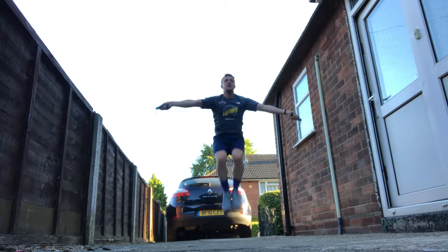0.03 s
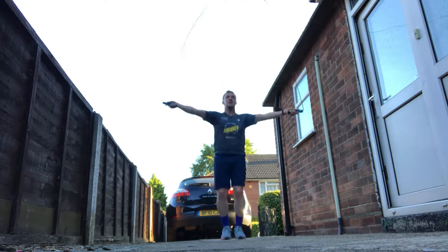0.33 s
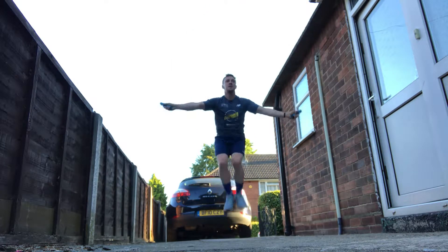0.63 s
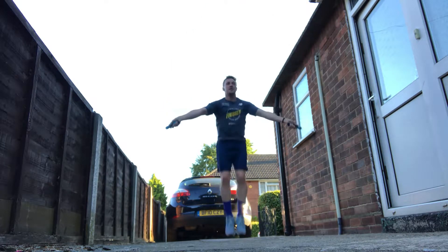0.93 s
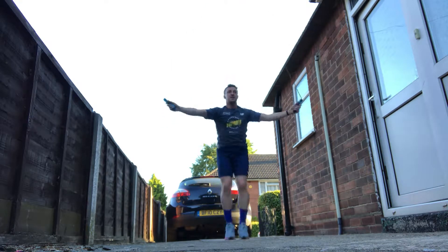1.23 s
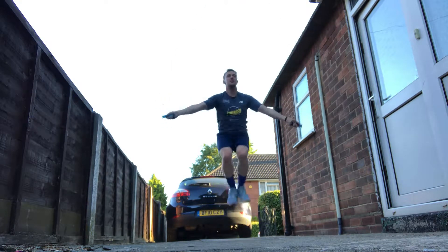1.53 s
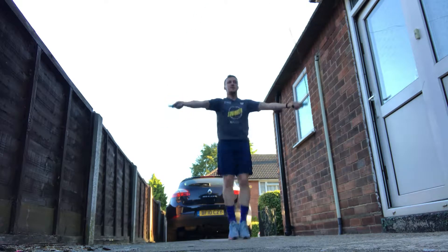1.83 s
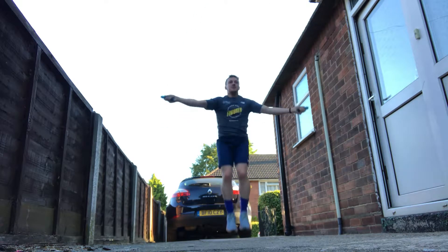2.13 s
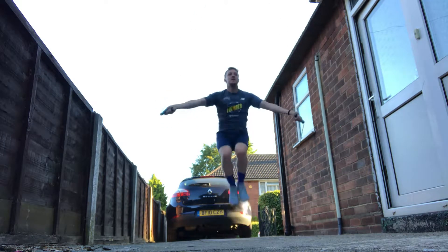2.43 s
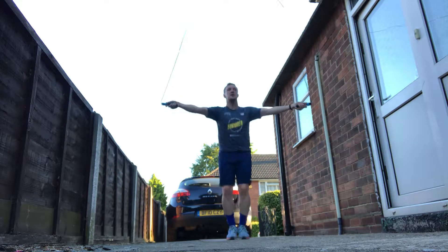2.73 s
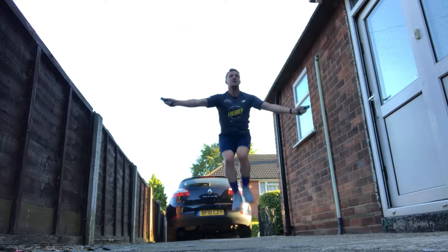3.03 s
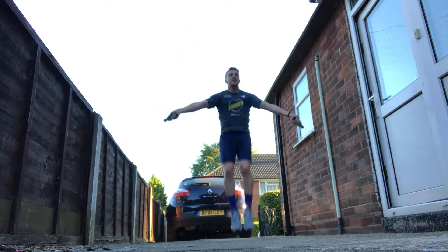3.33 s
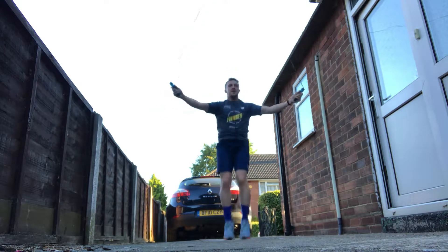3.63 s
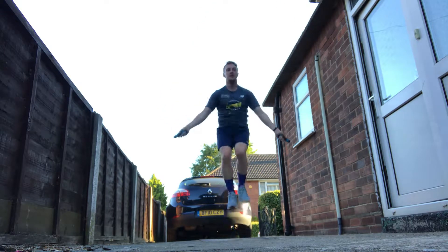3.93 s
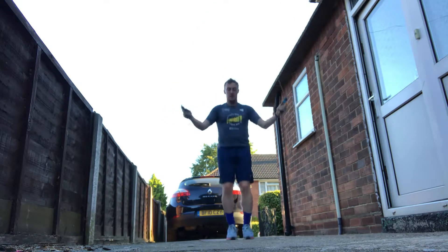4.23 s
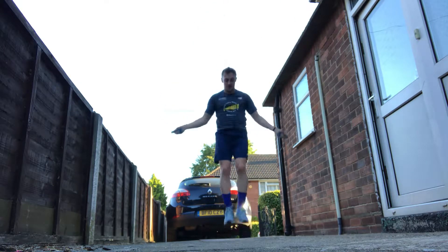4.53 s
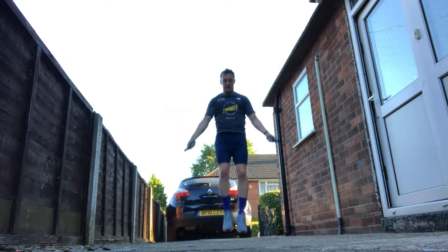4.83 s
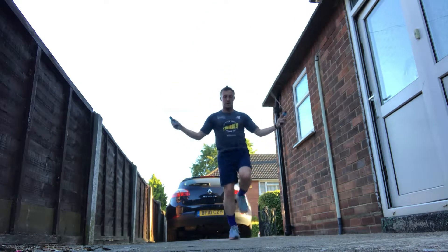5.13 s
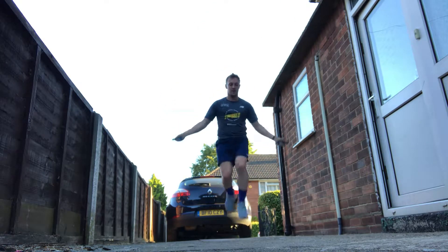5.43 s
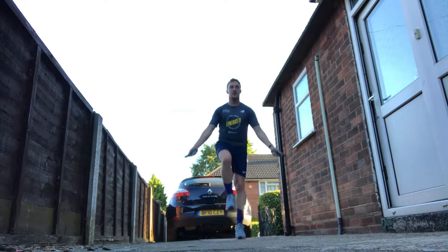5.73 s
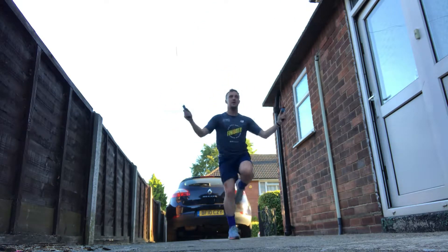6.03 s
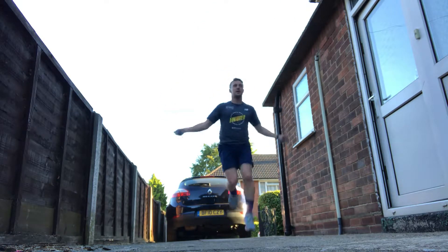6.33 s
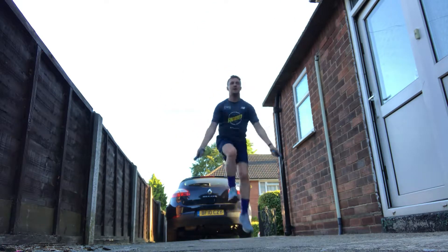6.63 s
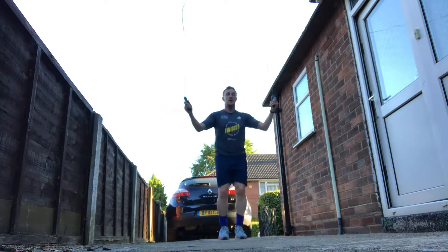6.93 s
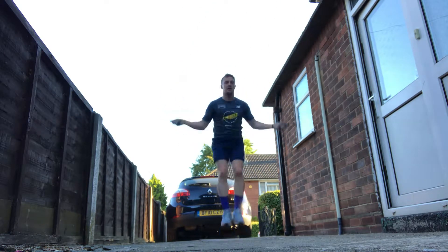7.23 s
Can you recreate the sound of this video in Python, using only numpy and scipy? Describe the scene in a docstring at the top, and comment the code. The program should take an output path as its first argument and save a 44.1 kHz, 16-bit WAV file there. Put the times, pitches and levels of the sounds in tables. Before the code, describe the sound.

Someone skips rope on a concrete driveway, heard from near the ground between a wooden fence and a brick wall that add short, close reflections. From the start, the thin rope makes a wavering, pulsing whistle, turning twice per jump. Shoes land about twice a second with a slap, a soft thud and a little crunch of grit, then scuff lightly as they push off. The rope catches with light ticks at about 1.1 and 1.6 seconds. From 4 seconds it is swung harder: the whistle climbs into a louder, higher swish, and the rope cracks sharply on the concrete once per jump, a little more than twice a second, strongest around 6.3 and 7.2 seconds. The landings become more uneven here, with small dry taps between them. A faint rush of stirred air and a distant outdoor hum continue underneath until the end, at about 7.5 seconds.

```python
"""Skipping rope on a concrete driveway

Heard from the ground, between a wooden fence and a brick wall. The thin rope sheds vortices and
whistles round twice a jump; shoes slap down, crunch on grit and scuff off again. The rope catches
a few times early on; after four seconds it is swung harder and cracks on the concrete once a jump.
Stirred air and a distant outdoor hum lie underneath."""
import sys
import numpy as np
from scipy import signal
from scipy.fft import rfft, irfft
from scipy.io import wavfile
from scipy.ndimage import uniform_filter1d

SR = 44100
rng = np.random.default_rng(int(sys.argv[2]) if len(sys.argv) > 2 else 0)


def file_out(sig):
    """Save sig as 16-bit WAV at sys.argv[1]."""
    # one column per channel
    cols = np.atleast_2d(sig).T
    # limit, then scale
    lim = np.clip(cols, -1, 1)
    pcm = np.round(lim * 32767).astype(np.int16)
    wavfile.write(sys.argv[1], SR, pcm)


N = 321930
TIME = np.arange(N) / SR

# rope hits on ground or shoe: t/s, strength/dB, tilt above 4 kHz/(dB per decade), scattered share/dB
ROPE_HITS = [(1.0747, -17, -24, -11.5), (1.109, -13, -10, -7), (1.5926, -10.5, -4, -7),
             (3.9806, -21, -35, -4.5), (4.0094, -7, 3.5, -3.5), (4.525, -3.5, 8, -2.5),
             (4.9977, -4, 4.5, -2), (5.4418, -4, 6, -1), (5.8705, -3.5, 7, -1.5), (6.3035, 2.5, 5.5, -3.5),
             (6.749, -9.5, 5.5, 3), (7.2151, -0.5, 8, -3)]
# footfalls, levels before make-up gain: t/s, slap/dB, thud/dB, grit/dB, rumble/dB, rumble lag/s
FOOTFALLS = [(0.355, -23, -41, -45, -49.5, .07), (0.841, -23.5, -40, -44, -51, .05),
             (1.307, -26.5, -42.5, -46.5, -49.5, .05), (1.783, -24.5, -43.5, -46.5, -49.5, 0.03),
             (2.255, -23.5, -40, -47.5, -47.5, 0.063), (2.746, -22.5, -48.5, -44, -50.5, .05),
             (3.227, -22, -41, -45, -55, 0.064), (3.721, -22, -42, -44, -51, 0.065),
             (4.208, -25, -44, -48.5, -48.5, 0.049), (4.71, -29.5, -38.5, -48.5, -47.5, 0.043),
             (5.166, -23.5, -42, -49.5, -50, .01), (5.564, -32.5, -89, -53.5, -55, 0.053),
             (5.605, -39.5, -45.5, -53.5, -49.5, .09), (6.036, -21.5, -45.5, -43.5, -41.5, 0.12),
             (6.463, -34.5, -44.5, -53.5, -50, .16), (6.941, -29, -43, -47, -50, 0.081)]
# tone of a sole on concrete: f/Hz, level/dB
SCUFF_SPECTRUM = [(300, -3), (1000, -4), (1450, -0.5), (1850, 1.5), (2150, -8), (2450, 5.5), (2850, -17.5),
                  (3400, -3), (5000, -10.5), (6800, -10), (10000, -26), (16000, -25)]
# early reflections of the shoes off the surroundings: delay/s, level/dB
SHOE_REFLECTIONS = [(.0095, -13), (0.0204, -11), (0.0227, -11)]


def swing(sag_octaves=.12, glide_s=.05836, brake_db=-6, brake_lag_s=.06):
    """Whistle pitch and level: wrist pulls speed the rope up, hits brake it, the slack cord wobbles."""
    # the rope's pace between pulls: t/s, f/Hz, level/dB
    pace = [(0, 520.8, -55), (1.5, 530, -53.5), (3.8, 510.6, -56), (4.07, 470.2, -64), (4.33, 440.4, -52),
            (4.6, 521, -60), (5.3, 549.5, -53), (5.5, 559, -56), (5.75, 590, -46), (6.2, 600.9, -48),
            (6.95, 600.4, -49), (7.3, 579.8, -52.5)]
    # pulls of the wrists: t/s, f/Hz, level/dB, length/s, glide/(octaves per s)
    pulls = [(0.092, 500, -47, 0.058, -2), (0.287, 575, -48, 0.099, .5), (0.533, 495, -45, 0.058, -2),
             (0.671, 681, -46, .04, -1), (0.759, 540, -48.5, 0.075, 2), (1.002, 510, -43.5, 0.084, -1),
             (1.221, 595.3, -45.5, 0.15, -1.5), (1.548, 555, -35, .035, 3), (1.731, 595, -42, 0.094, -2),
             (2.041, 520, -42.5, 0.056, 3.5), (2.193, 600, -46, 0.059, .5), (2.52, 545, -38.5, 0.047, 2),
             (2.679, 585, -43, .11, 1), (2.915, 505, -45.5, 0.073, -3.5), (3.071, 589, -52, .08, -2),
             (3.392, 509.3, -44, .085, -3.5), (3.58, 630, -45, .1, -1.5), (3.931, 440, -47.5, .08, -2),
             (4.153, 720, -40, 0.033, 1), (4.489, 700, -35.5, .07, -1.5), (4.67, 760, -41, .045, 4),
             (4.963, 680, -32, 0.059, 1), (5.145, 720, -42.5, .05, 6), (5.43, 878, -31, .048, 6),
             (5.583, 730, -39, 0.054, 1), (5.655, 579, -41.5, 0.033, -5), (5.86, 840, -31, .05, 8.5),
             (6.016, 870, -37.5, 0.057, 0), (6.14, 677.3, -43.5, 0.053, -3), (6.296, 951.5, -30.5, .05, 5),
             (6.45, 850, -39, .05, 0), (6.588, 650, -38, 0.033, -2), (6.741, 780, -34.5, .06, 4),
             (6.904, 790, -40.5, .055, -1), (6.98, 619.7, -45.5, 0.0408, -2.5),
             (7.198, 716.5, -31.5, 0.059, 5)]
    pace_hz, pace_db = in_time(pace)
    power = from_db(pace_db) ** 2
    weighted_octaves = power * np.log2(pace_hz)
    braking = from_db(brake_db * sum(swell(s + brake_lag_s, .025, .025) for s, *_ in ROPE_HITS))
    for s, hz, db, length, glide in pulls:
        pull_power = (from_db(db) * braking * swell(s, .58 * length, .44 * length)) ** 2
        progress = np.tanh((TIME - s) / glide_s)
        pull_octaves = np.log2(hz) + glide * glide_s * progress - sag_octaves * progress ** 2
        weighted_octaves += pull_power * pull_octaves   # the strongest pull leads the pitch
        power += pull_power
    wobble_octaves = .035 * drift(hz=14)
    flutter_db = 1.5 * drift(hz=16)
    return 2 ** (weighted_octaves / power + wobble_octaves), 10 * np.log10(power) + flutter_db


def rope_whistle(pitch, level_db, easy_hz=525, flicker_hz=11):
    """Shed vortices sing at a pitch that follows the rope's speed; swung fast, they become a swish."""
    # stretches of rope, each at its own speed:
    # pitch ratio, width/Hz, level/dB, growth/(dB per octave of speed), flicker/dB
    stretches = [(1.0, 18.3, -0.5, -11.5, -1.5), (.92, 41.4, -11, 11.5, 2), (1.08, 54, -9.5, 8.5, 3),
                 (.74, 57, -19.5, 16, 2), (1.25, 112, -24, 16, 2), (1.6, 150, -28.5, 13, 4),
                 (2.05, 48, -19, -4, 3.5), (2.9, 860, -35, 9, 3), (2.45, 76, -28, -2, 4.5),
                 (3.3, 60, -25.5, 3, 3.5)]
    phase = 2 * np.pi * np.cumsum(pitch) / SR
    speed_octaves = np.log2(pitch / easy_hz)
    tones = 0
    for ratio, width_hz, db, growth, flicker_db in stretches:
        gain = from_db(db + growth * speed_octaves + flicker_db * drift(flicker_hz))
        waver = drift(width_hz) + 1j * drift(width_hz)
        tones += gain * waver * np.exp(1j * ratio * phase)
    # even out slow changes so the swing sets the loudness; the fast flutter stays
    loudness = np.sqrt(uniform_filter1d(np.abs(tones) ** 2, size=1300))
    return from_db(level_db) * rms_one(tones.real / loudness)


def thin_whistles(tone_db=-2.0, width_hz=130):
    """Now and then the cord gives a brief, faint swish with a high note in it."""
    # high notes of the whirling cord: t/s, f/Hz, level/dB
    notes = [(0.59, 1920, -52.5), (1.539, 1900, -55.5), (3.03, 1747, -56), (3.48, 1830, -52.5),
             (4.36, 2533, -56), (4.781, 2484, -58), (5.28, 2470, -59.5), (6.17, 1848, -54),
             (7.09, 2437, -49)]
    # the swish round each note: f/Hz, level/dB
    swish_spectrum = [(600, -20), (1700, 1.5), (2400, 1), (2900, -10), (3800, -7.5), (7000, -18),
                      (12000, -30)]
    waver = from_db(tone_db) * (drift(width_hz) + 1j * drift(width_hz))
    swish = colour(rng.standard_normal(N), swish_spectrum)
    out = np.zeros(N)
    for s, hz, db in notes:
        tone = (waver * np.exp(2j * np.pi * hz * TIME)).real
        out += from_db(db) * swell(s, rise_s=.0098, fall_s=.021) * (swish + tone)
    return out


def rope_cracks(skid_db=-8.5, tail_db=.5):
    """One sharp pulse as the rope hits, then a brief skid over the grit."""
    # tone of the crack: f/Hz, level/dB
    crack_spectrum = [(100, -20.5), (400, 1.5), (900, -2), (1500, 1), (2700, -3), (3800, 2.5), (5000, -2),
                      (6300, 3.5), (8500, -5.5), (10500, -5), (12500, -4), (16000, -16)]
    # reflections off ground, fence and wall: delay/s, level/dB relative to the scattered share
    reflections = [(.0036, -4), (.0095, -8), (0.0147, -7.5)]
    out, tail_send = np.zeros(N), np.zeros(N)
    for s, strength_db, tilt_db, scatter_db in ROPE_HITS:
        contact = from_db(skid_db) * burst(rise_s=.0002, t60=.007, grain_db=4)
        contact[0] += 1
        tilted = [(hz, db + tilt_db * np.log10(max(hz / 4000, 1))) for hz, db in crack_spectrum]
        crack = from_db(strength_db) * unit_energy(colour(contact, tilted))
        echoes = [(delay, db + scatter_db) for delay, db in reflections]
        add(out, s, echoed(crack, echoes, wander=.35))
        add(tail_send, s, from_db(scatter_db + tail_db) * crack)
    return out + scatter(tail_send, build_s=.00032)


def landings(slap_gain_db=17, thud_gain_db=31.5, grit_gain_db=26.5, detune=.054, contact_s=.0003):
    """Two soles slap down almost together, the body's weight thuds and grit crunches underneath."""
    # modes of the sole and the air trapped under it: f/Hz, level/dB, t60/s
    sole_modes = [(322, -11.5, 0.03), (476, -14.5, 0.014), (615, -6, 0.023), (877, -8, 0.035),
                  (1024, 1.5, 0.014), (1643, -5, 0.02), (2154, -5, 0.014), (3560, -56, 0.0027)]
    # thud of the body's weight: f/Hz, level/dB
    thud_spectrum = [(40, -21), (100, -11.5), (190, -10), (310, 1.5), (480, -1), (900, -5), (3000, -63.5)]
    # crunch of grit: f/Hz, level/dB
    grit_spectrum = [(1000, -41), (2500, -5), (4000, -1.5), (5000, -7), (6600, -3), (9500, -25.5),
                     (16000, -29)]
    out = np.zeros(N)
    for s, slap_db, thud_db, grit_db, *_ in FOOTFALLS:
        soles = from_db(-13.5) * burst(rise_s=.002, t60=.019, grain_db=9)   # the sole rolls down
        soles[0] += 1   # first foot
        add(soles, .00274 * rng.uniform(.36, 1.394), from_db([-.5]))   # second foot
        rings = 0
        for k, (hz, db, t60) in enumerate(sole_modes):   # the sole bends differently each time
            gain = (-1) ** k * from_db(db + rng.normal())
            rings += gain * ring(soles, hz * np.exp(detune * rng.normal()), t60)
        slap = from_db(slap_db + slap_gain_db) * unit_energy(rings)
        weight = burst(rise_s=.00083, t60=.053, grain_db=.5)
        thud = from_db(thud_db + thud_gain_db) * unit_energy(colour(weight, thud_spectrum))
        crunch = burst(rise_s=.0001, t60=.025, grain_db=8.5)
        grit = from_db(grit_db + grit_gain_db) * colour(crunch, grit_spectrum)
        add(out, s + contact_s, echoed(slap + thud + grit, SHOE_REFLECTIONS, wander=.13))
    return out


def scuffs(gain_db=22.5, ring_db=-9, lead_s=.012, slip_hz=250, slip_db=2, detune=.09):
    """Toes stick and slip over the grit as they leave the concrete, and the sole rings with each slip."""
    # push-offs: t/s, relative level/dB
    push_offs = [(0.0161, -44.5), (0.5141, -42.5), (0.9999, -38.5), (1.463, -40.5), (1.928, -45),
                 (2.4114, -44), (2.8942, -40), (3.3831, -42.5), (3.871, -42.5), (4.371, -41), (4.8726, -44),
                 (5.3929, -35), (5.8405, -39), (6.2565, -38), (6.6829, -43.5), (6.8944, -48), (7.13, -48)]
    # modes of the slipping sole: f/Hz, level/dB, t60/s
    slip_modes = [(1520, 4.5, .03), (1840, 6.5, 0.04), (2332, -10, 0.034), (3360, -14.5, 0.014)]
    out = np.zeros(N)
    slips = from_db(slip_db * np.clip(drift(slip_hz), -2, 2))
    for s, level_db in push_offs:
        drag = burst(rise_s=.03, t60=.086, grain_db=6)
        drag = unit_energy(drag * np.roll(slips, -round(s * SR))[:len(drag)])
        rings = sum((-1) ** k * from_db(db) * ring(drag, hz * np.exp(detune * rng.normal()), t60)
                    for k, (hz, db, t60) in enumerate(slip_modes))
        scuff = colour(drag, SCUFF_SPECTRUM) + from_db(ring_db) * unit_energy(rings)
        add(out, s - lead_s, from_db(level_db + gain_db) * echoed(scuff, SHOE_REFLECTIONS, wander=.11))
    return out


def taps(gain_db=18.5):
    """Shoes and handles make small dry contacts between the jumps."""
    # light touches: t/s, relative level/dB
    touches = [(1.434, -52), (2.3694, -46), (2.9523, -45.5), (4.3354, -46.5), (4.7445, -37.5),
               (5.3106, -47.5), (5.696, -44.5), (5.7547, -49), (5.77, -47.5), (6.1749, -49), (6.5541, -49),
               (6.6292, -50), (7.0119, -45.5)]
    out = np.zeros(N)
    for s, level_db in touches:
        touch = burst(rise_s=.00018, t60=.045, grain_db=7)
        add(out, s, from_db(level_db + gain_db) * unit_energy(colour(touch, SCUFF_SPECTRUM)))
    return out


def echoed(sound, echoes, wander):
    """Direct sound and early reflections, their delays shifted at random for the jumper's movement."""
    out = np.pad(sound, (0, SR // 10))
    for delay, level_db in echoes:
        add(out, delay * (1 + wander * rng.uniform(-.77, 1)), from_db(level_db) * sound)
    return out


def scatter(sound, build_s):
    """Boards and bricks scatter the energy of each band into a diffuse tail that builds up and dies."""
    # decay of the passage between fence and wall: f/Hz, t60/s
    passage_decay = [(100, 0.16), (350, 0.35), (1200, 0.18), (4000, 0.19), (12000, .14)]
    edges_hz = np.geomspace(50, 18000, 19)
    white, tail = rng.standard_normal((2, N)), np.zeros(N)
    build = np.exp(-1 / (build_s * SR))
    for k, (low, high) in enumerate(zip(edges_hz, edges_hz[1:])):
        band = signal.butter(2, [low, high], "band", fs=SR, output="sos")
        t60 = at_hz(passage_decay, np.sqrt(low * high))
        decay = from_db(-60 / (t60 * SR)) ** 2
        power = signal.sosfilt(band, sound + 1e-12 * white[0]) ** 2
        power = signal.lfilter([1 - decay], [1, -decay], power)
        power = signal.lfilter([1 - build], [1, -build], power)
        tail += np.sqrt(power) * rms_one(signal.sosfilt(band, white[k % 2]))
    return tail


def rumble(still_db=-62.5, puff_db=-57.5, puff_s=.031):
    """Stirred air rumbles faintly, swells after each footfall and puffs with each rope hit."""
    # low end of the stirred air: f/Hz, level/dB
    rumble_spectrum = [(15, -51), (30, -7), (55, 1.5), (90, -3), (130, -13.5), (250, -20), (800, -61)]
    power = from_db(still_db) ** 2
    for s, *_, db, lag in FOOTFALLS:
        power += (from_db(db) * swell(s + lag, rise_s=.036, fall_s=.055)) ** 2
    for s, strength_db, *_ in ROPE_HITS:
        power += (from_db(strength_db + puff_db) * swell(s, puff_s, puff_s)) ** 2
    return np.sqrt(power) * colour(rng.standard_normal(N), rumble_spectrum)


def air(whistle_db, hum_db=-56, follow=.23):
    """A hiss that swells with each turn of the rope, over a distant outdoor hum."""
    # base level of the air hiss, higher at the faster pace: t/s, level/dB
    hiss_curve = [(0, -62), (4.1, -84), (4.45, -56.5), (5.5, -54.5), (6.2, -56), (7.3, -51)]
    # tone of the air hiss: f/Hz, level/dB
    hiss_spectrum = [(300, -2), (900, 2.5), (1500, 0.5), (2500, -12.5), (4000, -13), (6500, -16.5),
                     (10000, -23.5), (16000, -26)]
    # outdoor ambience: f/Hz, level/dB
    hum_spectrum = [(20, -21), (55, 3), (120, 4), (200, -3), (400, 4.5), (750, -4.5), (1150, -1.5),
                    (1850, -7), (2800, -16), (4200, -19.5), (6500, -22), (10000, -31), (16000, -33)]
    hiss_db = in_time(hiss_curve)[0] + follow * (whistle_db - whistle_db.mean())
    hiss = from_db(hiss_db) * colour(rng.standard_normal(N), hiss_spectrum)
    return hiss + from_db(hum_db) * colour(rng.standard_normal(N), hum_spectrum)


def burst(rise_s, t60, grain_db):
    """A cloud of tiny contacts of uneven size that swells and dies; unit energy."""
    t = TIME[:SR // 4]
    grains = rng.standard_normal(len(t))
    sizes = from_db(grain_db * np.clip(rng.standard_normal(len(t)), -2, 2))
    return unit_energy(grains * sizes * (1 - np.exp(-t / rise_s)) * from_db(-60 * t / t60))


def ring(x, hz, t60):
    """One resonance: a unit click sets a sine of height 1 ringing."""
    r, w = from_db(-60 / (t60 * SR)), 2 * np.pi * hz / SR
    return signal.lfilter([0, np.sin(w)], [1, -2 * r * np.cos(w), r * r], x)


def swell(s, rise_s, fall_s):
    """A rounded hump of height 1 at time s, with exponential flanks."""
    t = TIME - s
    return 1 / np.cosh(np.minimum(np.abs(t) / np.where(t < 0, rise_s, fall_s), 50))


def drift(hz):
    """Random modulation below hz, at rms 1."""
    slow = signal.sosfilt(signal.butter(2, hz, fs=SR, output="sos"), rng.standard_normal(N + SR))
    return rms_one(slow[SR:])


def colour(x, spectrum, size=8192):
    """Minimum-phase EQ of unit energy with the given spectrum."""
    gains = from_db(at_hz(spectrum, np.fft.rfftfreq(size, 1 / SR)))
    cepstrum = irfft(np.log(gains))
    cepstrum[1:size // 2] *= 2
    cepstrum[size // 2 + 1:] = 0
    impulse = unit_energy(irfft(np.exp(rfft(cepstrum))))
    return signal.fftconvolve(x, impulse)[:len(x)]


def add(track, s, sound):
    """Mix a sound into the track at time s."""
    start = max(round(s * SR), 0)
    track[start:start + len(sound)] += sound[:max(N - start, 0)]


def in_time(rows):
    """The columns of a curve at every sample."""
    s, *columns = np.transpose(rows)
    return [np.interp(TIME, s, c) for c in columns]


def at_hz(points, hz):
    """Read a table on a log-frequency axis."""
    freqs, values = np.transpose(points)
    return np.interp(np.log(np.maximum(hz, 1)), np.log(freqs), values)


def from_db(db):
    """Decibels to gain."""
    return 10 ** (np.asarray(db) / 20)


def rms_one(x):
    """Scale to rms 1."""
    return x / np.sqrt(np.mean(np.abs(x) ** 2) + 1e-20)


def unit_energy(x):
    """Scale to the energy of a unit click."""
    return x / np.sqrt(np.sum(x ** 2) + 1e-20)


def scene(shoe_tail_db=-4):
    """Rope, shoes and air in mono, heard near the ground."""
    pitch, whistle_db = swing()
    rope = rope_whistle(pitch, whistle_db) + thin_whistles() + rope_cracks()
    shoes = landings() + scuffs() + taps()
    shoe_tail = from_db(shoe_tail_db) * scatter(shoes, build_s=.0011)
    return (rope + shoes + shoe_tail + rumble() + air(whistle_db))[None]


def record(dry, low_cut_hz=35, high_cut_hz=16100):
    """The deepest bass rolls off and the top is cut steeply."""
    thinned = signal.sosfilt(signal.butter(2, low_cut_hz, "high", fs=SR, output="sos"), dry)
    return signal.sosfilt(signal.ellip(10, .1, 80, high_cut_hz, fs=SR, output="sos"), thinned)


dry = scene()
out = record(dry)
file_out(out)
```